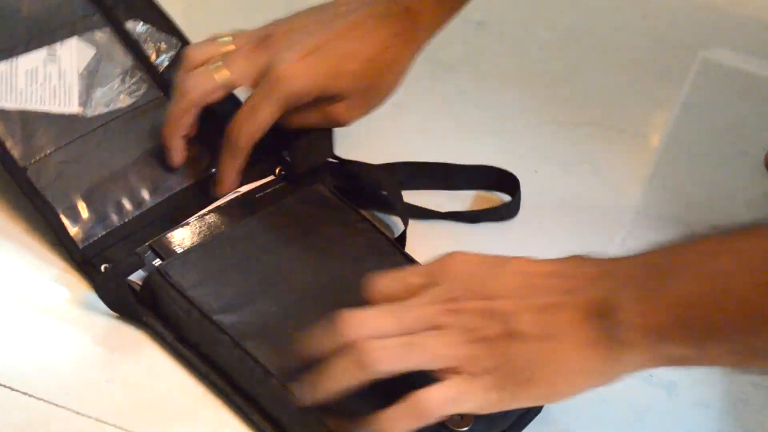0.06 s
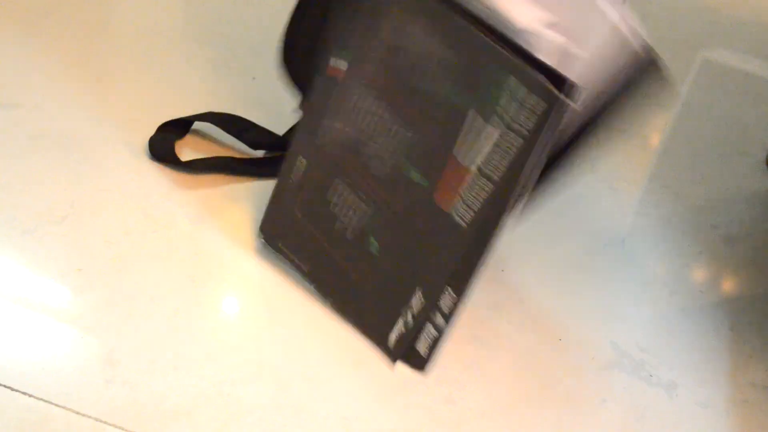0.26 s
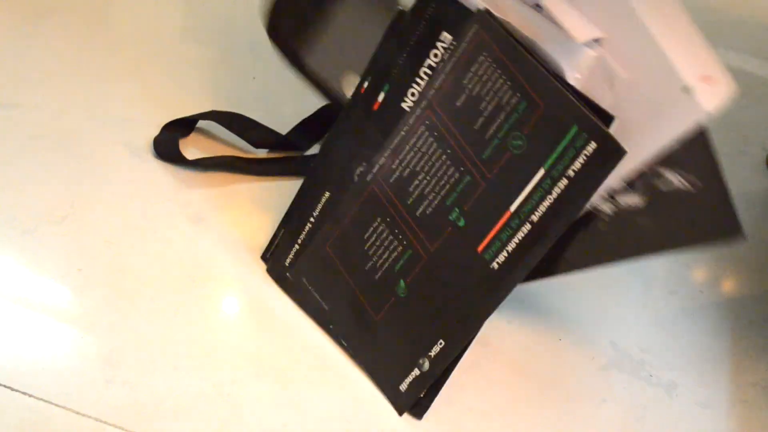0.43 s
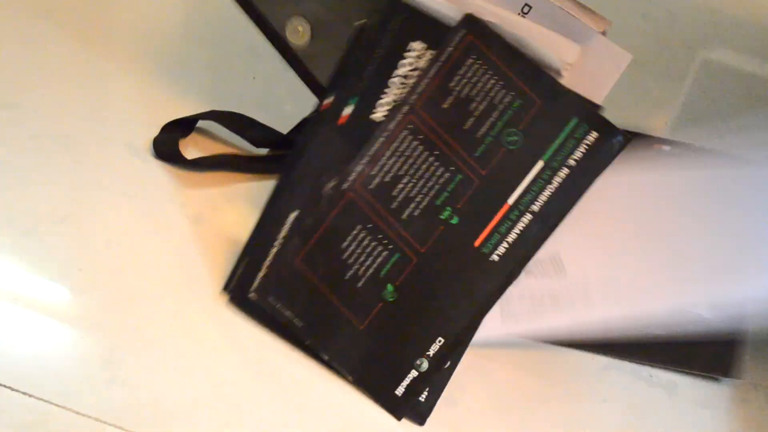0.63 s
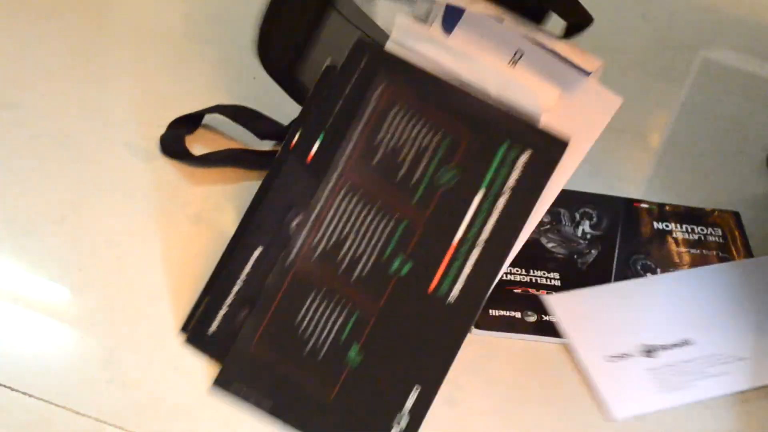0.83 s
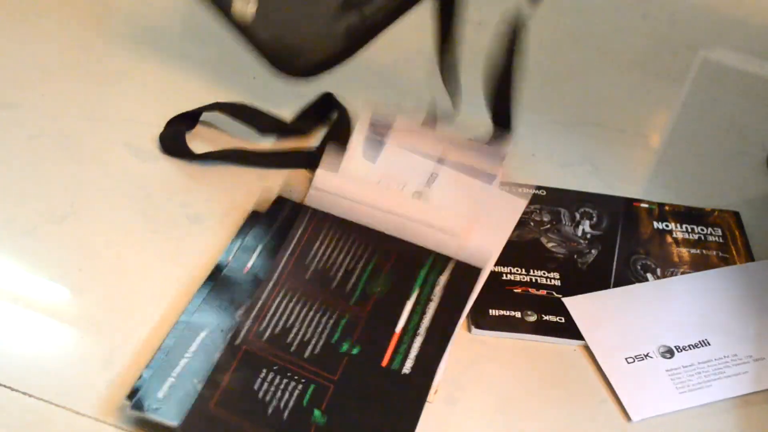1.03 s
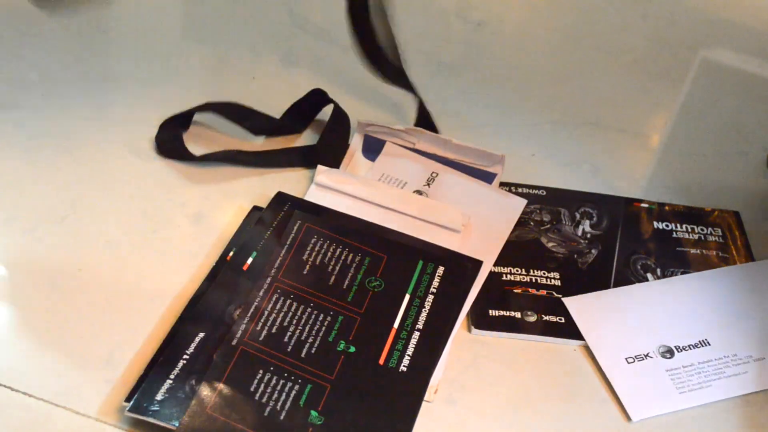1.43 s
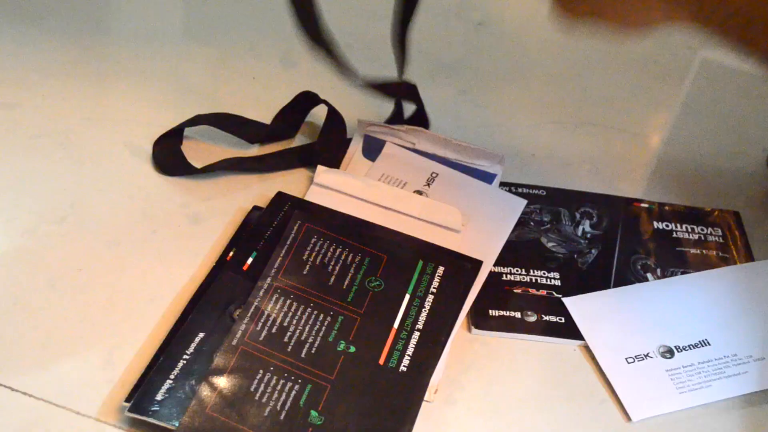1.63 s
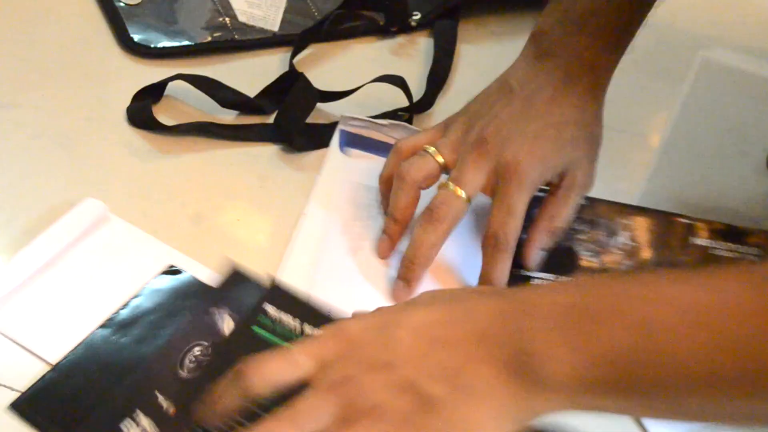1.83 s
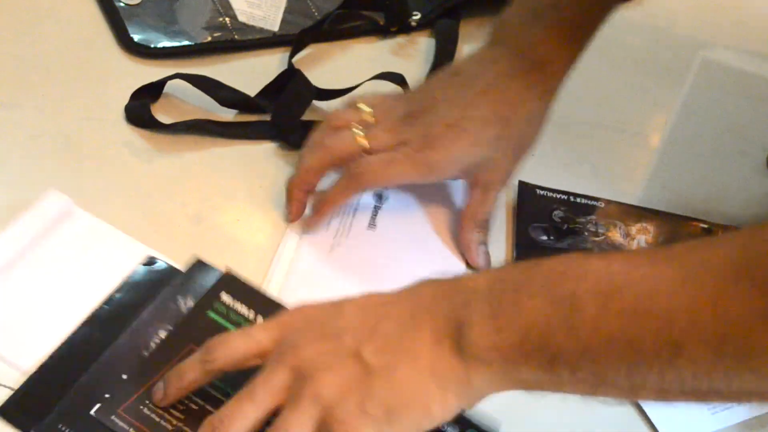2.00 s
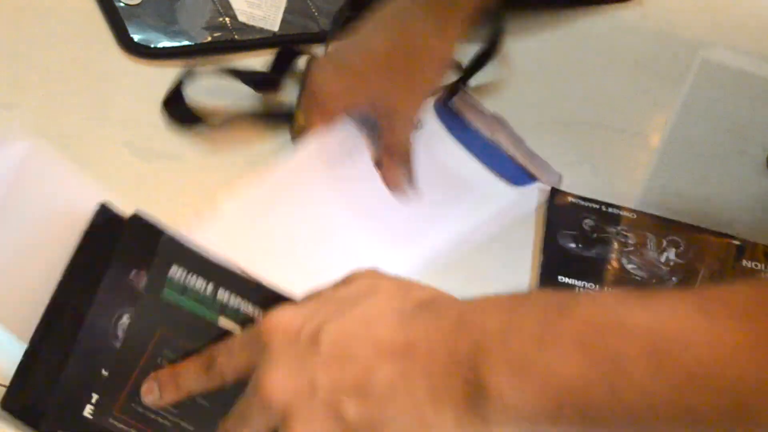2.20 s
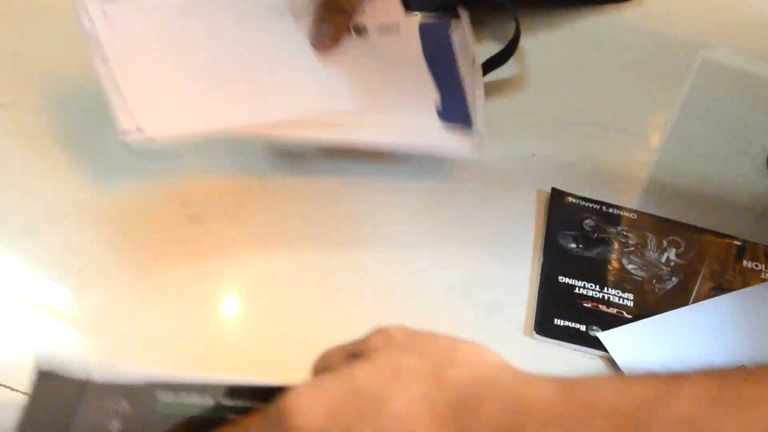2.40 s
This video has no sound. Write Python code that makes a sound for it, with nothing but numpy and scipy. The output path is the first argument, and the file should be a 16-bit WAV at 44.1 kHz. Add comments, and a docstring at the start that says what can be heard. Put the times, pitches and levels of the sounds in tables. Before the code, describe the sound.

Booklets and loose papers drop onto a hard surface in two bursts of sharp slaps. Lighter taps and rustles follow, then another slap, a brief cover squeak and sliding sheets, close to the microphone in a bare room.

```python
"""A bare room: booklets and loose papers are shaken out of a fabric case onto a hard glossy surface,
then gathered by hand. Each landing is a short slap with a brief ring of the cover; the heaviest push
out a puff of air. In between, sheets slide and rustle, a dragged cover squawks and a card knocks on
its edge. The room rings on over a steady noise floor; the close microphone clips on the loudest slaps."""
import sys
import numpy as np
from scipy import signal
from scipy.fft import rfft, irfft, next_fast_len
from scipy.io import wavfile

SR = 44100
rng = np.random.default_rng(int(sys.argv[2]) if len(sys.argv) > 2 else 0)


def dump(signal):
    """Clip the signal to [-1, 1] and save it as 16-bit WAV at the path in sys.argv[1]."""
    limited = np.clip(np.atleast_2d(signal).T, -1, 1)
    pcm = np.round(limited * 32767).astype(np.int16)
    wavfile.write(sys.argv[1], SR, pcm)


N = 112454


def from_db(db):
    """Decibels to gain."""
    return 10 ** (np.asarray(db) / 20)


def unit_rms(x):
    """Scale to rms 1."""
    return x / np.sqrt(np.mean(x ** 2) + 1e-20)


def at_hz(table, hz):
    """Interpolate a table over log frequency."""
    table_hz, values = np.transpose(table)
    return np.interp(np.log(np.maximum(hz, 1)), np.log(table_hz), values)


def add(out, time_s, x):
    """Mix x in at time_s."""
    start = int(time_s * SR)
    x = x[max(-start, 0):max(N - start, 0)]
    out[max(start, 0):max(start, 0) + len(x)] += x


def coloured(x, colour, bass_db=0, treble_db=0, bass_hz=487, treble_hz=3900):
    """Minimum-phase filter: colour table, bass shelf, treble tilt."""
    n = 2 * next_fast_len(len(x))
    hz = np.arange(n // 2 + 1) * SR / n
    shelf = 1 / (1 + (hz / bass_hz) ** 4)
    tilt = np.log(1 + (hz / treble_hz) ** 2) / np.log(6)
    gain = from_db(at_hz(colour, hz) + bass_db * shelf + treble_db * tilt)
    cepstrum = irfft(np.log(gain))
    cepstrum[1:n // 2] *= 2
    cepstrum[n // 2 + 1:] = 0
    return irfft(rfft(x, n) * np.exp(rfft(cepstrum)))[:len(x)]


def resonance(x, hz, width_hz):
    """Two-pole resonator; rms 1."""
    radius = np.exp(-np.pi * width_hz / SR)
    feedback = [1, -2 * radius * np.cos(2 * np.pi * hz / SR), radius ** 2]
    return unit_rms(signal.lfilter([1, 0, -1], feedback, x))


def with_ring(x, hz, width_hz, ring_db):
    """x plus a sheet's bending mode; rms 1."""
    return unit_rms(unit_rms(x) + from_db(ring_db) * resonance(x, hz, width_hz))


def flat_burst(noise, envelope):
    """Enveloped noise, whitened so it has no pitch; rms 1."""
    burst = noise * envelope
    limit = 2 * unit_rms(envelope)
    for _ in range(4):
        spectrum = rfft(burst)
        whitened = irfft(spectrum / (abs(spectrum) + 1e-12), len(burst))
        burst = np.clip(unit_rms(whitened), -limit, limit)
    return unit_rms(burst)


# Noise floor spectrum: (frequency [Hz], relative density [dB])
FLOOR_COLOUR = [(20, -12), (45, -10), (70, -3.5), (100, 1.5), (170, -4), (350, -3.5), (900, -8),
                (1800, -4.5), (3500, -16), (6000, -26.5), (12000, -31), (16000, -64)]


def noise_floor(level_db=-41.5):
    """Steady, dull background noise."""
    return from_db(level_db) * unit_rms(coloured(rng.standard_normal(N), FLOOR_COLOUR))


# Room decay: (frequency [Hz], T60 [s])
ROOM_T60 = [(150, 0.63), (600, 0.5449), (1400, 0.8067), (3000, 0.94), (7000, 0.79), (14000, 1.6652)]
# Echo spectrum: (frequency [Hz], gain [dB])
ECHO_COLOUR = [(60, 6.5), (250, -2), (700, 1), (1400, 0), (3000, -3), (6000, -5), (15000, -11.5)]


def room(x, tail_db=-0.5, onset_s=0.0098, early_db=-5.5, early_decay_s=0.012, size=32768):
    """Early reflections off nearby surfaces, plus a diffuse tail decaying band by band."""
    t = np.arange(size) / SR
    edges_hz = np.geomspace(50, 18000, 10)
    white, tail = rng.standard_normal((3, size)), np.zeros(size)
    for k, (low, high) in enumerate(zip(edges_hz, edges_hz[1:])):
        bandpass = signal.butter(2, [low, high], "band", fs=SR, output="sos")
        t60_s = at_hz(ROOM_T60, np.sqrt(low * high))
        tail += signal.sosfilt(bandpass, white[k % 2]) * from_db(-60 * t / t60_s)
    tail = unit_rms(tail * (1 - np.exp(-t / onset_s)))
    early = flat_burst(white[2], np.sqrt(t) * np.exp(-t / early_decay_s))
    response = coloured(from_db(tail_db) * tail + from_db(early_db) * early, ECHO_COLOUR)
    return signal.fftconvolve(x, response / np.sqrt(size))[:N]


# Air puffs: (time [s], peak [dB])
AIR_PUFFS = [(0.288, -42), (.691, -32), (0.7895, -18), (1.858, -27), (1.899, -36)]


def air_puffs(decay_s=0.0017, size=4096):
    """Air escapes from under a flat booklet in one pressure swing."""
    out = np.zeros(N)
    age = np.arange(size) / SR / decay_s
    swing = age * (2 - age) * np.exp(-age)
    for time_s, peak_db in AIR_PUFFS:
        add(out, time_s, from_db(peak_db) * swing / swing.max())
    return out


# Sheet slides: (time [s], length [s], level [dB], ring [Hz], ring [dB], hiss tilt [dB])
SHEET_SLIDES = [(-.03, .09, -34, 870, 7, 4.5), (.045, 0.033, -30, 1950, 3, 4),
                (.085, 0.068, -36.5, 690, -2, 16.5), (.208, 0.066, -29, 1400, 1, 4),
                (.29, 0.052, -25, 880, -26, -5.5), (.35, 0.083, -33, 1410, -22, -3),
                (.745, 0.098, -24, 1620, -5, -2), (0.976, 0.078, -34.5, 1700, -5, 6),
                (1.045, 0.044, -27, 1724, -8.5, 3.5), (1.10, 0.063, -36.5, 1150, 6, -12),
                (1.358, 0.059, -43, 1420, 0.5, 7), (1.436, 0.068, -40.5, 1380, -13, 7.5),
                (1.55, 0.048, -38.5, 1390, -11, 1), (1.655, 0.14, -44, 1550, -20, 9.5),
                (1.93, 0.0081, -28, 1200, -9, -15), (1.985, .10, -40.5, 1150, -10, 8),
                (2.09, 0.07, -37, 950, -8, 3), (2.17, 0.039, -32, 840, 2, 13),
                (2.22, 0.081, -41, 680, 0, -1), (2.28, 0.15, -45.5, 740, -2, 7),
                (2.47, 0.052, -51, 780, 10, 34)]
# Paper friction spectrum: (frequency [Hz], relative level [dB])
FRICTION_COLOUR = [(60, -27.5), (300, -11), (800, -2.5), (1800, -3), (3300, -7), (5000, -15), (9000, -19.5),
                   (16000, -33.5)]


def sheet_slides(catches_per_s=3500, spread_db=4.5, smooth_db=-1.5, size=12288):
    """Dense tiny paper-on-paper catches over smooth friction excite the sheet's resonance."""
    out, t = np.zeros(N), np.arange(size) / SR
    for time_s, length_s, level_db, ring_hz, ring_db, hiss_db in SHEET_SLIDES:
        strengths = from_db(spread_db * np.minimum(rng.exponential(1, size), 5))
        signs = rng.choice([-1, 1], size)
        caught = rng.random(size) < catches_per_s / SR
        friction = unit_rms(strengths * signs * caught) + from_db(smooth_db) * rng.standard_normal(size)
        friction = coloured(friction, FRICTION_COLOUR, treble_db=hiss_db)
        rustle = with_ring(friction, ring_hz, width_hz=440, ring_db=ring_db)
        swell = 1 - np.exp(-t / (0.13 * length_s))
        fade = np.exp(-np.maximum(t - length_s, 0) / (0.25 * length_s))
        add(out, time_s, from_db(level_db) * swell * fade * rustle)
    return out


# Cover drags: (time [s], length [s], level [dB], slip rate [Hz], jitter [ratio], scrape [dB])
COVER_DRAGS = [(1.863, .012, -15.5, 790, 0.13, 1), (1.878, 0.028, -20.5, 807, 0.054, 1.5),
               (2.167, 0.023, -30, 880, 0.31, -21), (2.231, 0.038, -28.5, 660, .25, -17)]


def cover_drags(attack_s=0.0027, release_s=0.003, buzz_db=-12, slip_count=120, size=4096):
    """Uneven stick-slip makes a glossy cover squawk; a scrape pulses in step."""
    out, t = np.zeros(N), np.arange(size) / SR
    for time_s, length_s, level_db, slip_hz, jitter, scrape_db in COVER_DRAGS:
        slips_s = np.cumsum(np.exp(jitter * rng.standard_normal(slip_count))) / slip_hz
        slips_s = slips_s - slips_s[0]
        pulses = np.bincount((slips_s * SR).astype(int), rng.uniform(0.34, 1, slip_count), size)[:size]
        grip = 1 + np.cos(2 * np.pi * np.interp(t, slips_s, np.arange(slip_count)))
        buzz = from_db(buzz_db) * unit_rms(pulses - pulses.mean())
        friction = unit_rms(grip * rng.standard_normal(size)) + buzz
        scrape = from_db(scrape_db) * unit_rms(coloured(friction, FRICTION_COLOUR, treble_db=-5.5))
        squawk = resonance(pulses, slip_hz, width_hz=150)
        stroke = np.minimum(t / attack_s, 1) * np.exp(-np.maximum(t - length_s, 0) / release_s)
        add(out, time_s, from_db(level_db) * stroke * unit_rms(squawk + scrape))
    return out


# Card bending modes: (frequency [Hz], relative level [dB], T60 [s])
CARD_MODES = [(1250, 4, 0.029), (2530, -8, 0.039), (3675, -1.5, 0.023)]


def card_knock(time_s=0.4484, gain_db=-6.5, rise_s=0.0012):
    """A stiff card lands on its edge; its modes build to a hollow knock as it settles."""
    out, t = np.zeros(N), np.arange(SR // 4) / SR
    modes = sum(from_db(db - 60 * t / t60_s) * np.sin(2 * np.pi * hz * t) for hz, db, t60_s in CARD_MODES)
    add(out, time_s, from_db(gain_db) * (1 - np.exp(-t / rise_s)) * modes)
    return out


# Paper and hands hitting the surface: (time [s], level [dB], contact decay [s], thud shelf [dB],
# crack tilt [dB], ring [Hz], ring [dB], room send [dB])
SLAPS = [(0.2076, -24, 0.0087, -12, 5.5, 2000, -10, 6), (0.237, -14, .002, 4.5, 4.5, 1020, -13, -1.5),
         (.276, -11, 0.0025, -1, -3, 1040, -8, -12), (0.2792, -12, 0.0028, -6.5, 3, 1070, -10, -9),
         (0.2854, -1.5, 0.0033, 1, -2, 860, -6, -5.5), (.298, -18.5, 0.0056, 14, 9, 690, -23, -5),
         (0.377, -14, 0.0019, 2, -4, 1370, -0.5, -1.5), (.387, -23, 0.0015, 5, 2, 1700, 2, -4),
         (0.4485, -13, 0.0018, -7, -5, 1280, -9.5, 0.5), (0.691, -9.5, 0.0031, 4, -6.5, 534, -32, 2.5),
         (.7428, -10.5, 0.0053, -7.5, -4.5, 1490, -10, -1),
         (0.7887, -1.5, 0.0022, -9.5, -12.5, 1250, -5, -1), (.799, -8.5, 0.0032, 3, -10, 845, -4, 1.5),
         (.809, -12, 0.0037, -8.5, -26, 1340, -17, 6.5), (0.8128, -9, 0.0012, 2.5, -3, 830, -4, -0.5),
         (.823, -14.5, 0.0048, 7, -5, 1700, 6, 1.5), (1.101, -19, 0.0088, -1.5, -17, 1110, -2, -5.5),
         (1.109, -17.5, 0.0021, 2.5, 0, 3200, -7.5, -4), (1.2461, -27.5, .001, 14.5, 6.5, 960, -4, -1.5),
         (1.522, -29.5, 0.0028, 7, 3, 1850, -1, 1), (1.531, -24, .0018, 11, 7.5, 1250, -6, -1),
         (1.542, -22.5, 0.0038, 16, 6, 1330, -1.5, -1.5), (1.567, -33, 0.024, -5, 3, 830, -9, 6),
         (1.6508, -31.5, .002, -11, 5.5, 1180, -9, 8), (1.8578, -8.5, 0.0019, 2.5, 8, 750, -5.5, -6),
         (1.957, -29, 0.0017, -14, 10, 2020, 9, 1), (1.969, -10.5, 0.0018, 7.5, -35, 1250, -13, -1.5),
         (1.983, -16.5, 0.001, -19, 11.5, 1180, 4.5, 0), (2.1114, -28, 0.0017, 6, 6, 2290, 0, -3),
         (2.180, -20.5, 0.0022, 9, -5, 950, 12, -4), (2.2505, -35, 0.0025, 15, 4, 694, 15, 5.5),
         (2.413, -38, 0.0025, -3, 6, 2200, -21, -2), (2.458, -24.5, 0.0023, 19, -4, 1270, 4, -5),
         (2.467, -31.5, 0.0025, 32, -12, 950, 4, 6)]
# Slap spectrum: (frequency [Hz], relative level [dB])
SLAP_COLOUR = [(40, -48), (150, -16), (350, -7), (750, -0.5), (1400, -2), (2200, -5), (3400, -8.5),
               (4800, -17), (9000, -23), (16000, -33)]


def slaps(touch_db=-6, rise_s=0.000488, spots=3, size=4096):
    """First touch, fast-dying crush of pages, brief cover ring. Returns direct sound and room sends."""
    direct, sends = np.zeros(N), np.zeros((spots, N))
    t = np.arange(size) / SR
    touch = from_db(touch_db) * unit_rms(1.0 * (t == 0))
    energy_scale = np.sqrt(0.005 * SR / size)  # level = rms with all energy in 5 ms
    for k, (time_s, level_db, decay_s, thud_db, crack_db, ring_hz, ring_db, send_db) in enumerate(SLAPS):
        envelope = (1 - np.exp(-t / rise_s)) * np.exp(-t / decay_s)
        crush = flat_burst(rng.standard_normal(size), envelope)
        impact = coloured(touch + crush, SLAP_COLOUR, thud_db, crack_db)
        slap = with_ring(impact, ring_hz, width_hz=203, ring_db=ring_db)
        slap *= from_db(level_db) * energy_scale
        add(direct, time_s, slap)
        add(sends[k % spots], time_s, from_db(send_db) * slap)
    return direct, sends


def scene(drag_send_db=-11.5, card_send_db=-8.5):
    """Mono mix of paper, room and noise floor; each landing spot has its own echo."""
    hits, sends = slaps()
    rustle, squawk, knock = sheet_slides(), cover_drags(), card_knock()
    echo = sum(room(send) for send in sends)
    echo += room(rustle + from_db(drag_send_db) * squawk + from_db(card_send_db) * knock)
    return (noise_floor() + echo + air_puffs() + rustle + squawk + knock + hits)[None]


def record(dry):
    """Microphone overload on the loudest slaps, then a steep low-pass."""
    clip_level, cutoff_hz = 0.95, 15600
    lowpass = signal.ellip(10, 0.1, 80, cutoff_hz, fs=SR, output="sos")
    return signal.sosfilt(lowpass, np.clip(dry, -clip_level, clip_level))


dry = scene()
out = record(dry)
dump(out)
```